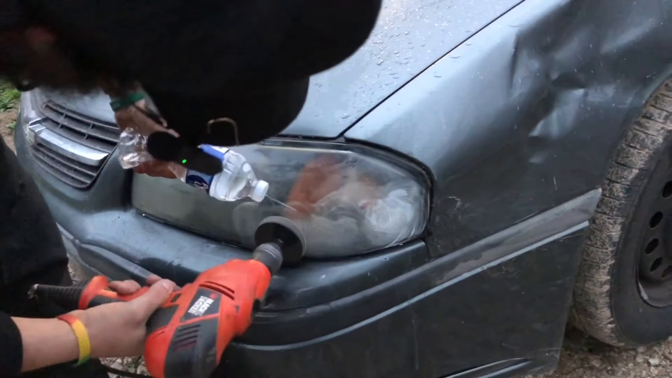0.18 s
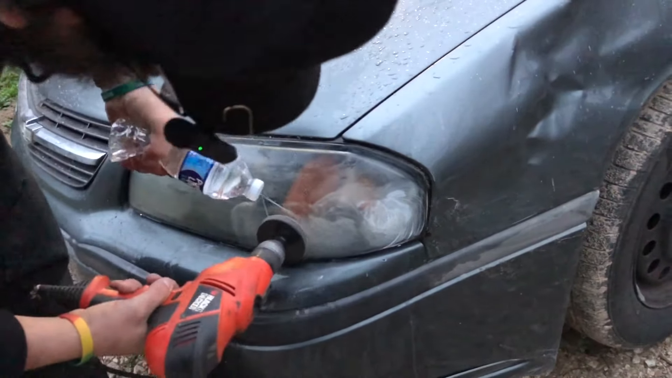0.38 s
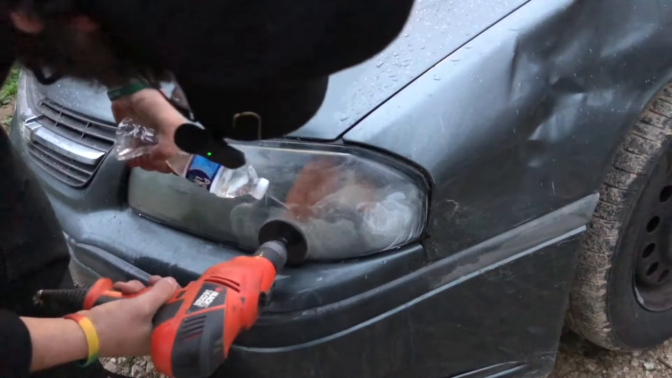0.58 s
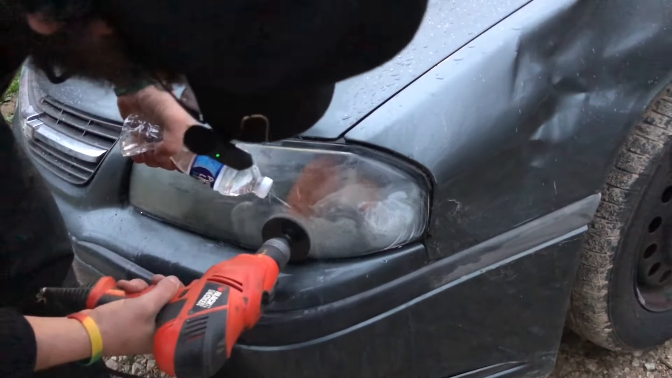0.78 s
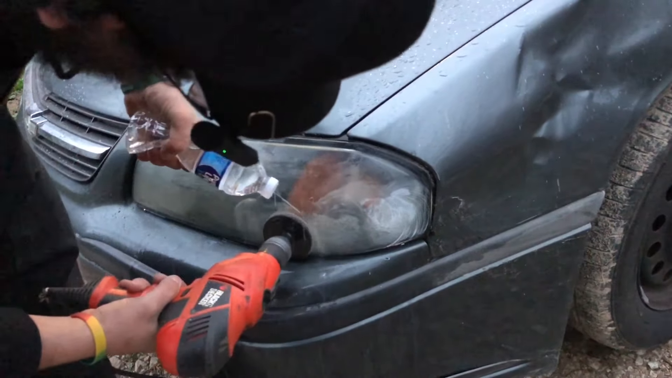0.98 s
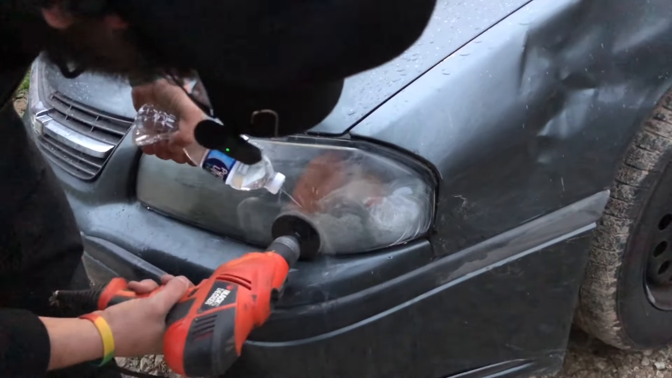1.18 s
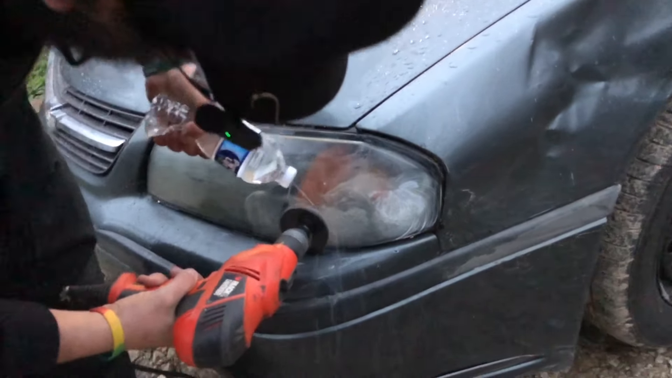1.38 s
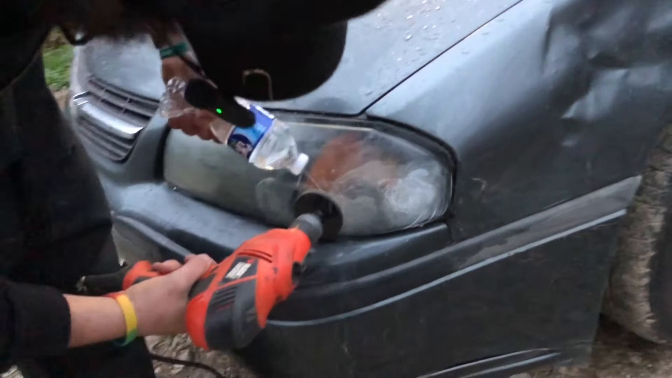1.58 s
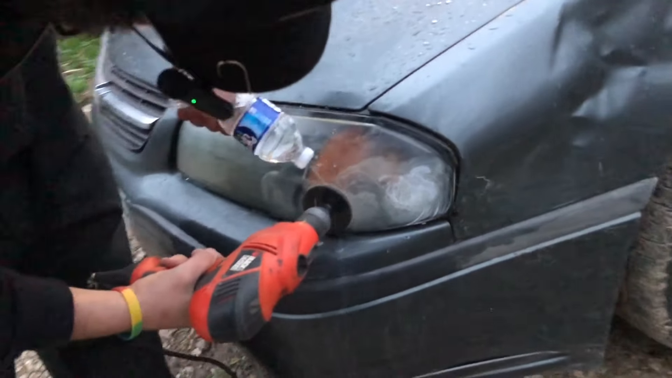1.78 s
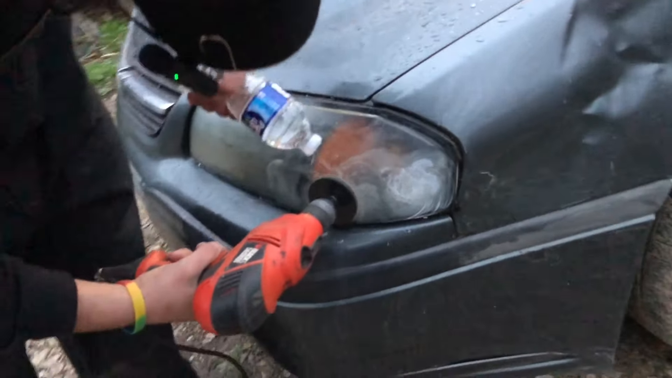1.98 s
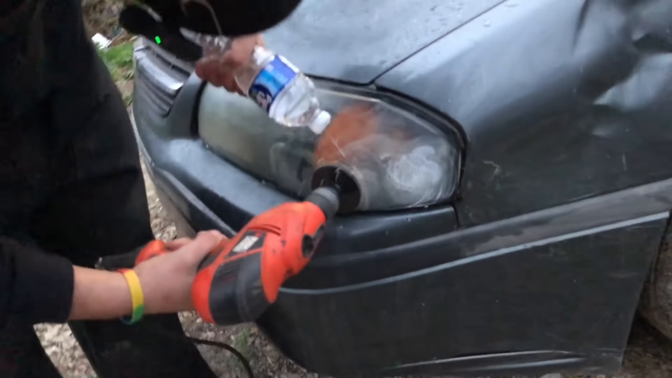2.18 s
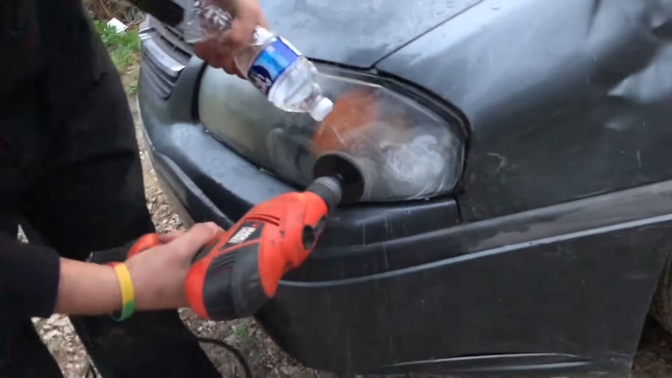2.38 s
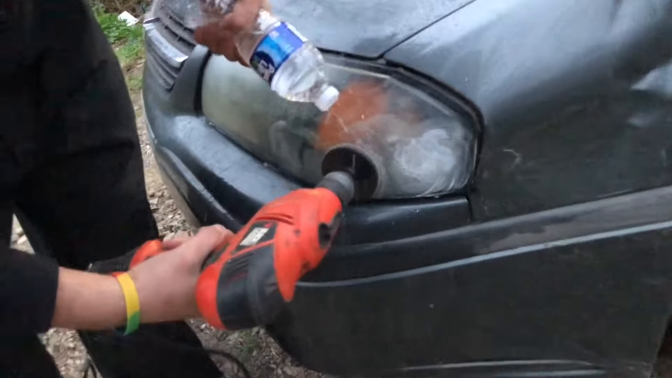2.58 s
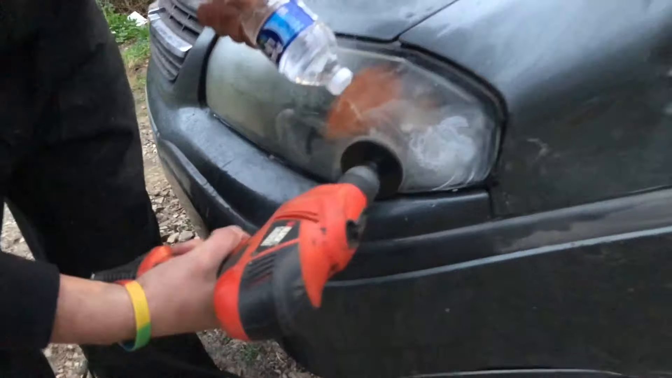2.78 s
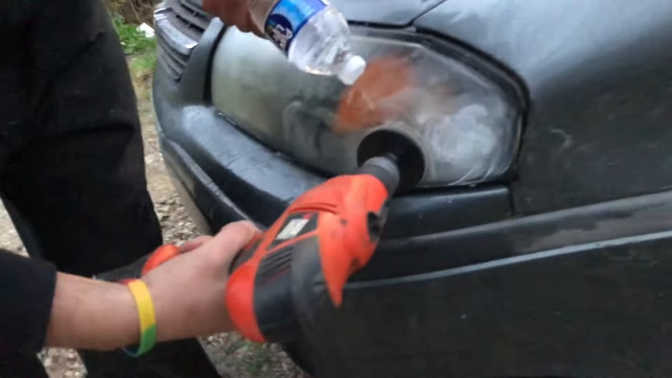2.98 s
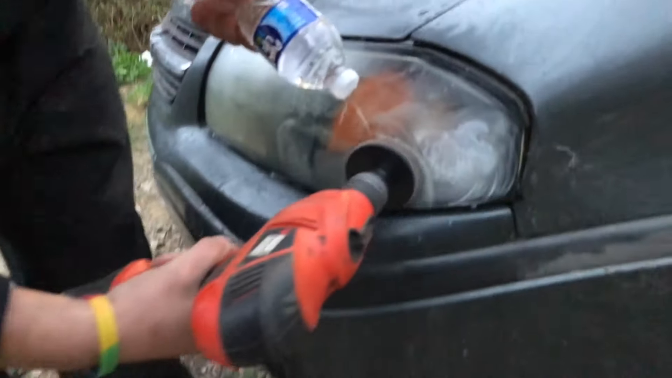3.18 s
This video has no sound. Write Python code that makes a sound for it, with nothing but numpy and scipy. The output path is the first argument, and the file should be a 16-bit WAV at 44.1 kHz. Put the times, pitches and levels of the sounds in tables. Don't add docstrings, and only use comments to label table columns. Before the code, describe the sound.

Drill with sanding pad winds up from low growl to full-speed roar within a second, grinds harshly on a plastic lens, then drops to quieter hissing whir; close, dry, outdoors, with faint handling bumps.

```python
import sys
import numpy as np
from scipy import signal
from scipy.fft import rfft, irfft, next_fast_len
from scipy.io import wavfile
from scipy.ndimage import uniform_filter1d, map_coordinates

SR = 44100
rng = np.random.default_rng(int(sys.argv[2]) if len(sys.argv) > 2 else 0)


def magnitude_from_level(level_db):
    exponent = np.asarray(level_db, float) / 20
    return 10 ** exponent


def transcribe(signal):
    frames = np.atleast_2d(signal).T
    limited = np.clip(frames, -1, 1)
    pcm = np.round(limited * 32767).astype(np.int16)
    wavfile.write(sys.argv[1], SR, pcm)


N = 141120
T = np.arange(N) / SR
MAINS_HZ, FIRST_KICK_S = 60.04, .0068
GEAR_ORDER = 2.6347

# [t/s, level/dB, pad pressure/dB, fan air/dB]
WORK = [(0, -23.5, -0.5, -22), (.06, -22.5, -4, -5), (.14, -22, -4.5, -4.5), (.22, -21, -1.5, -0.5),
        (.42, -13.5, -8, -5.5), (.6, -9, -6, -6), (.8, -6, -1, -5.5), (1.1, -5.5, -1.5, -3.5),
        (1.4, -6.5, 1, -1), (1.7, -5, -1.5, -2.5), (1.95, -11, 1.5, 3.5), (2.15, -17.5, 3.5, 7),
        (2.35, -23.5, 3, 9), (2.55, -26, 3, 10), (2.75, -25.5, -1.5, 5.5), (3, -24.5, -3, 2.5),
        (3.2, -27, 1.5, 6)]


def unit(x):
    return x / np.sqrt(np.mean(x ** 2) + 1e-20)


def curves(rows):
    s, *cols = np.transpose(rows)
    return [np.interp(T, s, c) for c in cols]


def slope(points, hz):
    f, v = np.transpose(points)
    return magnitude_from_level(np.interp(np.log(hz + 1), np.log(f + 1), v))


def resonance(hz, c, w):
    return 1j * hz * w / (c * c - hz * hz + 1j * hz * w)


def peaks(rows, hz):
    total = 0
    for k, (c, w, db) in enumerate(rows):
        w = max(w, .035 * c)
        total = total + (-1) ** k * magnitude_from_level(db) * resonance(hz, c, w)
    return total


def wobble(rate):
    knots = rng.standard_normal(int(N * rate / SR) + 4)
    return map_coordinates(knots, [np.arange(N) * rate / SR])


def filtered(x, response):
    m = next_fast_len(N + 8192)
    return irfft(rfft(x, m) * response(np.fft.rfftfreq(m, 1 / SR)), m)[:N]


def rush(response, patchy_db):
    z = signal.stft(rng.standard_normal(N), nperseg=512)[2]
    field = uniform_filter1d(rng.standard_normal(z.shape), size=5, axis=0)
    field = uniform_filter1d(field, size=9, axis=1)
    patchy = signal.istft(z * magnitude_from_level(patchy_db * unit(field)), nperseg=512)[1][:N]
    return unit(filtered(patchy, response))


def mains_cycle():
    return (T - FIRST_KICK_S) * MAINS_HZ + 1


def coasting():
    depth_db = 7 * np.clip(1 - T / .6, 0, 1)
    return magnitude_from_level(uniform_filter1d(depth_db * (.4 - mains_cycle() % 1), size=40))


def hollowed(x):
    # [start t/s, end t/s, f/Hz, width/Hz, depth 0-1]
    hollow_rows = [(-.2, 0.55, 773, 149, 0.65), (-.2, 1.25, 1960, 110, 0.7), (-.2, 1.3, 3220, 220, 0.25),
                   (-.2, 0.55, 4720, 200, 0.9), (-.2, 0.48, 13000, 4000, 0.74),
                   (1.25, 2.6, 2770, 380, 0.37), (1.298, 2.07, 1690, 297, 0.2), (2.1, 10, 3470, 168, 0),
                   (2.3, 3, 7400, 700, 0.34), (.55, 1.05, 850, 109, 0), (1.9, 2.52, 190, 121, 0.78)]
    fade_s = .12
    for start, end, c, w, depth in hollow_rows:
        inside = np.clip(np.minimum(T - start, end - T) / fade_s + .5, 0, 1)
        share = np.clip(depth, 0, 1) * inside
        x = x - share * filtered(x, lambda hz: resonance(hz, c, w))
    return x


def housing(hz):
    # [f/Hz, width/Hz, level/dB]
    body_modes = [(591, 273, -1), (1070, 270, 3), (1310, 21, 2.5), (1880, 290, -5), (2160, 24, -7.5),
                  (2546, 59, 4.5), (2920, 24, -1.5), (3700, 760, -1.5), (4970, 21, -16), (5050, 170, -8.5),
                  (5530, 36, -10), (6770, 150, -13.5), (6750, 21, -9)]
    # [f/Hz, level/dB per Hz]
    body_base = [(18, -74), (30, -58), (492, 4), (787, -13), (1080, 9.5), (1640, -18), (2130, 6),
                 (10200, -43), (15500, -15.5)]
    return np.hypot(.5 * slope(body_base, hz), np.abs(peaks(body_modes, hz)))


def rattle():
    return magnitude_from_level(-8 + .7 * wobble(30)) * rush(housing, patchy_db=.9)


def rub(press_db):
    # [f/Hz, width/Hz, level/dB]
    lens_modes = [(445, 47, -9), (770, 40, -3), (917, 31, -1.5), (1322, 207, 6)]
    # [f/Hz, level/dB per Hz]
    lens_base = [(30, -84), (200, -26.5), (414, -13.5), (640, -23.5), (848, -32.5), (1370, -5.5),
                 (2800, -14), (9000, -24)]

    def lens(hz):
        return np.hypot(slope(lens_base, hz), 0.7 * np.abs(peaks(lens_modes, hz)))

    return magnitude_from_level(-6 + press_db + 0.18 * wobble(15.26)) * rush(lens, patchy_db=1.3)


def fan_air(air_db):
    # [f/Hz, level/dB per Hz]
    flow_base = [(1500, -44), (3350, -10), (3650, 2), (4400, -4), (7000, -6.5), (8700, -26), (9300, -22.5),
                 (15000, -22.5)]
    # [f/Hz, width/Hz, level/dB]
    vent_modes = [(3000, 290, -16), (3850, 200, -10), (4180, 310, 4), (5050, 150, -3), (6400, 300, -10.5),
                  (8420, 330, -7.5), (10550, 1400, -17), (13300, 1900, -18.5)]

    def vents(hz):
        return np.hypot(slope(flow_base, hz), np.abs(peaks(vent_modes, hz)))

    return magnitude_from_level(-6.5 + air_db + 0.78 * wobble(33.9)) * rush(vents, patchy_db=-1.5)


def kicks():
    # [t/s, level/dB]
    kick_course = [(0, 6), (.06, -0.5), (.1, -2.5), (.2, 0), (.3, 1), (.45, -12), (.65, -11)]
    # [f/Hz, width/Hz, level/dB]
    ring_modes = [(564, 190, -8), (1070, 280, -6), (2010, 380, -0.5), (2640, 180, 2.5), (3870, 760, -1.5)]
    first_kicks = [-1, 0, -2, 2, 3, 2, -1, 1, 3, 1, -1, 4, 4, 3, 0, 2, 2, 1, 1, -1, 1, 7, 2, 2]
    rise_s, fall_s, top_hz = .0004, .0042, 6000
    cycle = mains_cycle()
    age = cycle % 1 / MAINS_HZ
    count = N // 500
    trend_db = np.pad([0, *first_kicks], (0, count))[:count]
    size_db = (.6 * rng.standard_normal(count) + trend_db)[cycle.astype(int)]
    envelope = (1 - np.exp(-age / rise_s)) * np.exp(-(age / fall_s) ** 2 / 2)
    burst = magnitude_from_level(size_db) * envelope * rng.standard_normal(N)

    def ring(hz):
        return (peaks(ring_modes, hz) + 0.028 * housing(hz)) / (1 + 1j * hz / top_hz) ** 2

    over_db, = curves([*kick_course, (.9, -24)])
    return magnitude_from_level(over_db) * unit(filtered(burst, ring))


def tones(speed):
    pad_orders = [8, GEAR_ORDER, 3 * GEAR_ORDER, 1.264, 2.357, 3.064, 8.336]
    pad_levels = [2.5, 0, -1, -9, -8, -4, -9]
    # [f/Hz, gain/dB]
    path_gain = [(100, -22), (430, -4.5), (560, 4.5), (700, -18), (930, 2.5), (1150, -3), (3400, -15),
                 (3590, -10), (3680, 0.5)]
    # [t/s, shaft/dB, second order/dB, second gear multiple/dB, ninth order/dB]
    order_levels = [(0.1, -54.0, -68.0, -62.0, -56.0), (0.3, -55.0, -49.0, -43.0, -43.0),
                    (0.42, -55.0, -35.0, -48.0, -42.0), (0.54, -56.0, -28.0, -40.0, -46.0),
                    (0.65, -46.0, -35.0, -46.0, -48.0), (0.72, -38.0, -43.0, -25.0, -26.0),
                    (0.84, -32.0, -29.0, -25.0, -27.0), (0.92, -29.0, -26.0, -39.0, -29.0),
                    (1.02, -31.0, -30.0, -25.0, -27.0), (1.15, -34.0, -29.0, -29.0, -21.0),
                    (1.3, -27.0, -23.0, -27.0, -23.0), (1.45, -29.0, -26.0, -23.0, -22.0),
                    (1.6, -39.0, -21.0, -28.0, -18.0), (1.75, -31.0, -22.0, -26.0, -17.0),
                    (1.9, -30.0, -26.0, -29.0, -18.0), (2.0, -39.0, -25.0, -27.0, -22.0),
                    (2.12, -35.0, -31.0, -23.0, -28.0), (2.2, -41.0, -32.0, -27.0, -27.0),
                    (2.28, -54.0, -31.0, -37.0, -31.0), (2.36, -52.0, -37.0, -27.0, -31.0),
                    (2.46, -48.0, -39.0, -34.0, -35.0), (2.56, -42.0, -49.0, -37.0, -34.0),
                    (2.7, -59.0, -49.0, -46.0, -30.0), (2.81, -58.0, -47.0, -36.0, -28.0),
                    (2.89, -46.0, -47.0, -46.0, -34.0), (2.96, -48.0, -48.0, -34.0, -34.0),
                    (3.04, -62.0, -53.0, -41.0, -40.0), (3.12, -67.0, -50.0, -50.0, -32.0),
                    (3.19, -61.0, -43.0, -51.0, -34.0)]
    # [multiple of shaft speed, dB over the work level]
    whine_orders = [(9.97, -31), (10.539, -30), (10.98, -32), (11.535, -30), (12.02, -32), (12.575, -34),
                    (13.23, -34), (13.66, -32), (14.68, -35), (15.745, -38)]
    turns = np.cumsum(speed) / SR

    def tone(order, shake=1):
        unsteady = magnitude_from_level(shake * (2 * wobble(24) + 2.5 * wobble(75) - 1.2))
        return np.sqrt(2) * unsteady * np.sin(2 * np.pi * order * turns + .5 * shake * wobble(80))

    borne = sum(magnitude_from_level(db) * slope(path_gain, order * speed) * tone(order)
                for order, db in zip(pad_orders, pad_levels))
    shaft_db, second_db, gear_db, ninth_db = curves(order_levels)
    shaft_db = shaft_db + np.interp(speed, [150, 330], [-25, 0])
    ninth_db = ninth_db + np.interp(T, [2, 2.3], [0, 3])
    loose = np.interp(T, [1.1, 1.6], [.25, .85])
    orders = [(1, shaft_db), (2, second_db), (2 * GEAR_ORDER, gear_db), (9, ninth_db)]
    steady = sum(magnitude_from_level(db + 5 - 5 * loose) * tone(order, shake=loose) for order, db in orders)
    whine = sum(magnitude_from_level(db + 4) * tone(order) for order, db in whine_orders)
    borne_gain = magnitude_from_level(uniform_filter1d(second_db, size=SR // 3))
    return borne_gain * borne + steady + magnitude_from_level(curves(WORK)[0]) * whine


def blades(speed):
    # [t/s, level/dB]
    whistle_course = [(.07, -52), (.11, -41), (.22, -38), (.35, -40), (.52, -34), (.56, -38), (.6, -36),
                      (.69, -34), (.75, -38)]
    blade_count, full_trigger_s = 40, .55
    cycle = mains_cycle()
    held = np.interp(FIRST_KICK_S + (np.floor(cycle) - .5) / MAINS_HZ, T, speed)
    stepped = np.where(T < full_trigger_s, uniform_filter1d(held, size=160), speed)
    alternate_db = np.interp(T, [.27, .36], [-5, 0]) * (-1) ** np.floor(cycle)
    scatter_db = uniform_filter1d(alternate_db, size=120) + 2.5 * wobble(45) + 1.5
    db = curves([*whistle_course, (.78, -120)])[0] + scatter_db
    phase = 2 * np.pi * blade_count * np.cumsum(stepped) / SR
    return np.sqrt(2) * magnitude_from_level(db) * np.sin(phase + 0.25 * wobble(150))


def drill():
    # [t/s, shaft speed f/Hz]
    run_up = [(0, 80), (.11, 121), (.18, 155), (.228, 174), (.31, 207), (.38, 234), (.55, 289), (.7, 381),
              (.83, 420), (.97, 441), (1.12, 456), (1.3, 464), (1.6, 465.5), (2.05, 465), (2.5, 468),
              (2.88, 468), (3.08, 465), (3.2, 467)]
    level_db, press_db, air_db = curves(WORK)
    speed, = curves(run_up)
    flutter_db = 0.33 * wobble(6.1) + 0.29 * wobble(40.2)
    noise = coasting() * (rattle() + rub(press_db) + fan_air(air_db))
    body = magnitude_from_level(level_db + flutter_db) * (noise + magnitude_from_level(-5.5) * kicks())
    return hollowed(body) + tones(speed) + blades(speed)


def skims():
    # [t/s, length/s, f/Hz, level/dB]
    swells = [(0.236, 0.081, 2170, -24.5), (2.29, 0.44, 3810, -23.5), (2.02, 0.43, 1345, -18),
              (2.358, 0.11, 701, -32.5), (1.1, 0.066, 1740, -26), (3.024, 0.4, 1615, -28),
              (2.98, 0.22, 1430, -29.5), (3.09, 0.12, 1660, -37), (3.19, 0.054, 1200, -28.5),
              (2.37, 0.34, 3070, -34), (2.85, 0.46, 3070, -35.5), (0.88, 0.048, 1076, -16),
              (0.485, 0.15, 1080, -27), (3, 0.56, 10200, -44)]
    out = np.zeros(N)
    for s, length, c, db in swells:
        mode = [(c, 0.066 * c, 0)]
        sing = unit(filtered(rng.standard_normal(N), lambda hz: peaks(mode, hz) ** 2))
        out += magnitude_from_level(db) * np.exp(-(1.53 * (T - s) / length) ** 2) * sing
    return out


def knocks():
    # [t/s, peak level/dB]
    bumps = [
        (0.108, -43),
        (0.338, -41),
        (0.559, -39),
        (0.671, -35),
        (0.993, -41),
        (1.705, -42),
    ]
    knock_hz, t60_s, lead_s = 126, 0.14, .014
    out, t = np.zeros(N + SR), np.arange(SR // 5) / SR
    bump = np.sin(2 * np.pi * knock_hz * t) * magnitude_from_level(-60 * t / t60_s) * (1 - np.exp(-t / 0.004))
    for s, db in bumps:
        out[round((s - lead_s) * SR):][:len(t)] += magnitude_from_level(db + 4) * bump
    return out[:N]


def outdoor_floor():
    # [f/Hz, level/dB per Hz]
    ground = [(20, -6), (100, -8.5), (300, 5), (900, -30)]
    return magnitude_from_level(-61) * rush(lambda hz: slope([*ground, (3000, -90)], hz), patchy_db=3)


def partings():
    # [t/s, low f/Hz, high f/Hz, level/dB]
    bursts = [(.748, 14300, 15700, -44), (.907, 5600, 7100, -30), (.907, 8900, 11200, -31),
              (1.261, 6200, 7700, -26), (1.261, 14300, 15700, -38), (1.398, 8900, 10500, -34),
              (1.467, 7500, 9100, -31), (2.977, 6200, 7700, -43), (2.977, 11600, 13900, -44)]
    length_s = .026
    white = rng.standard_normal(N)
    out = np.zeros(N)
    for s, lo, hi, db in bursts:
        hiss = unit(filtered(white, lambda hz: (hz > lo) * (hz < hi)))
        out += magnitude_from_level(db) * np.exp(-((T - s) / length_s * 2) ** 4) * hiss
    return out


def ceiling(x):
    hz, t, z = signal.stft(x, SR, nperseg=1024)
    jump = np.clip(rng.standard_normal(len(t)) + .4, 0, 2)[np.arange(len(t)) // 3]
    top_hz = 15230 + 330 * jump
    top_hz[np.abs(t - .73) < .04] = SR / 2
    return signal.istft(z * (hz[:, None] < top_hz), SR, nperseg=1024)[1][..., :N]


def scene():
    mono = drill() + coasting() * skims() + knocks() + outdoor_floor()
    return np.tile(mono, (2, 1))


def band_limit(x):
    return signal.sosfilt(signal.butter(12, 15800, fs=SR, output="sos"), x)


def record(dry):
    # [f/Hz, gain/dB]
    top_end = [(14800, -0.5), (15150, -3), (15400, -7), (15800, -10)]
    mono = filtered(dry[0], lambda hz: slope(top_end, hz))
    stereo = mono + np.outer([1, -1], partings())
    return band_limit(ceiling(np.clip(stereo, -1, 1)))


dry = scene()
out = record(dry)
transcribe(out)
```